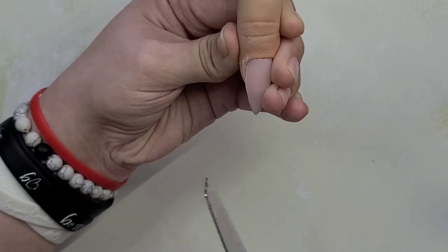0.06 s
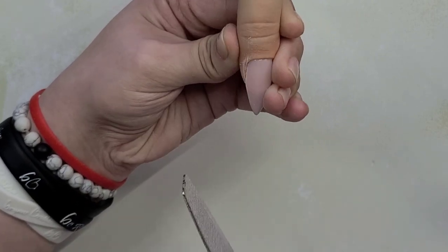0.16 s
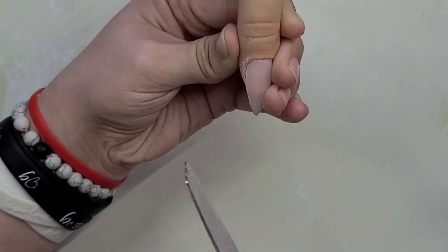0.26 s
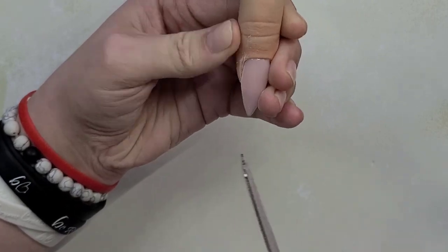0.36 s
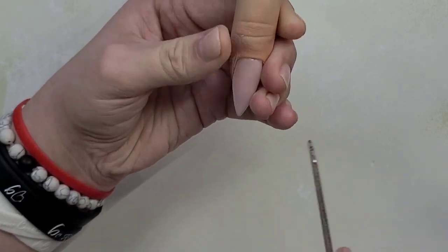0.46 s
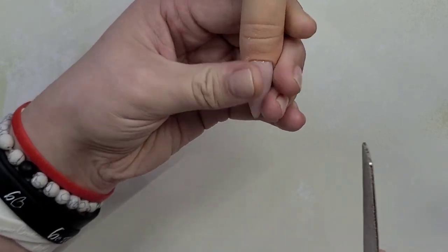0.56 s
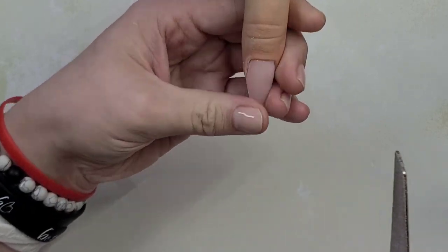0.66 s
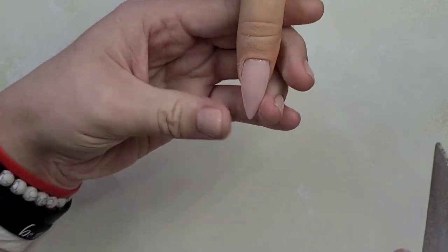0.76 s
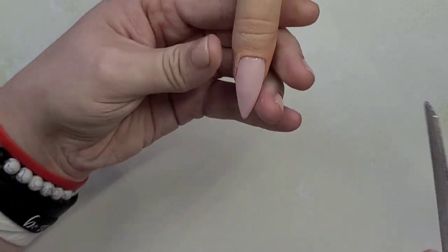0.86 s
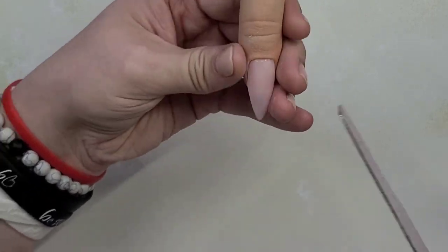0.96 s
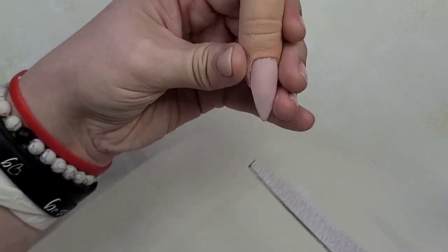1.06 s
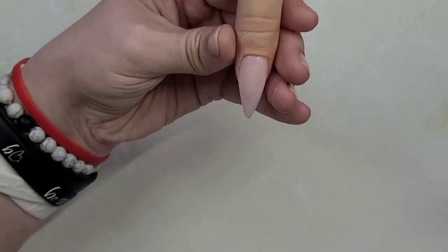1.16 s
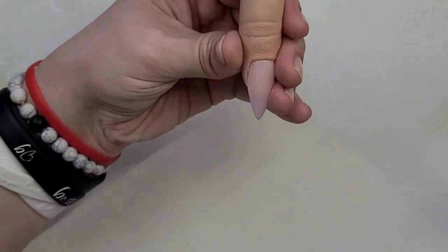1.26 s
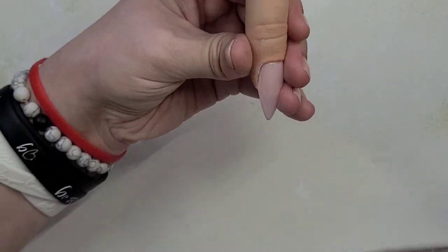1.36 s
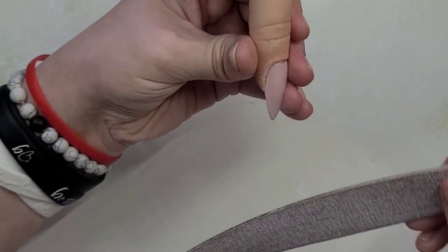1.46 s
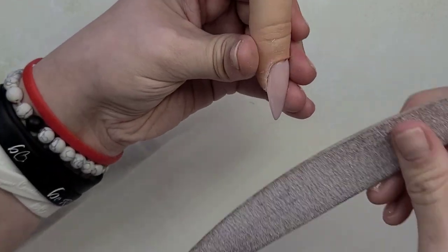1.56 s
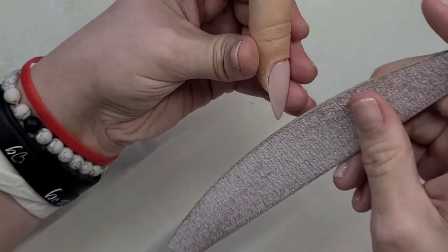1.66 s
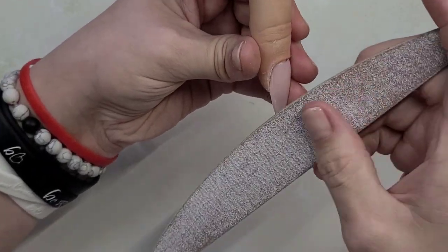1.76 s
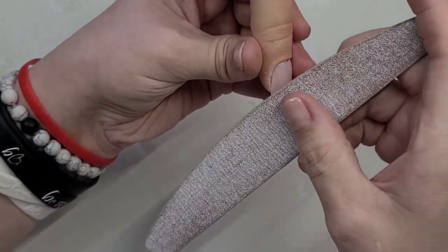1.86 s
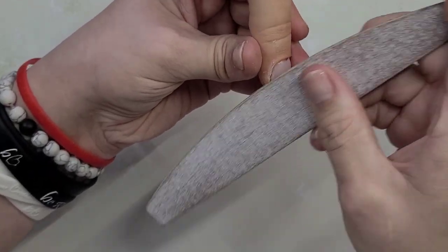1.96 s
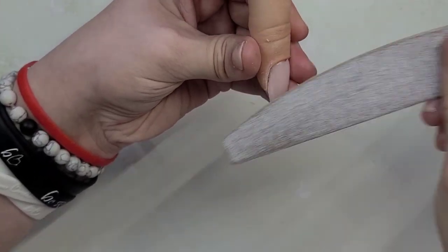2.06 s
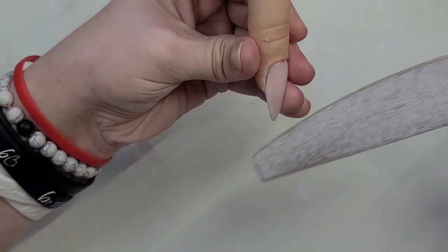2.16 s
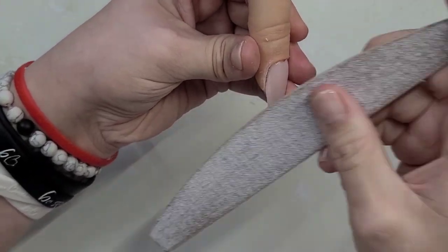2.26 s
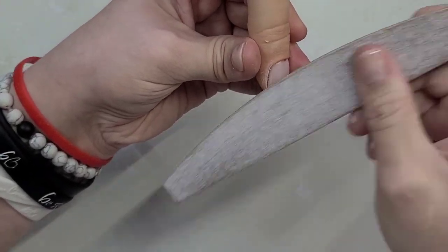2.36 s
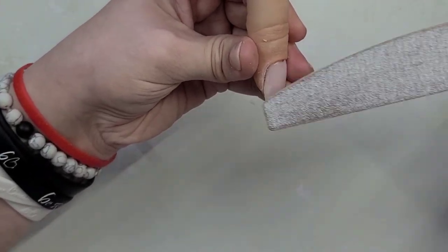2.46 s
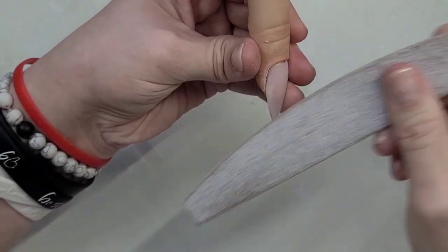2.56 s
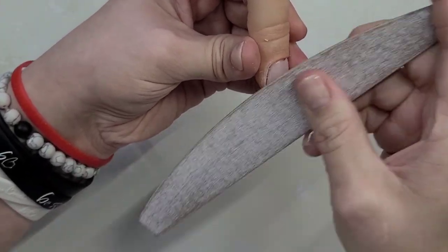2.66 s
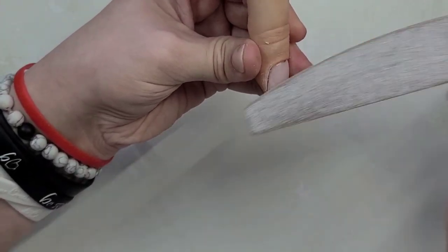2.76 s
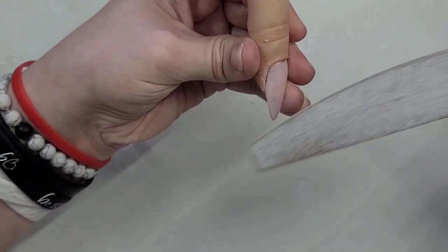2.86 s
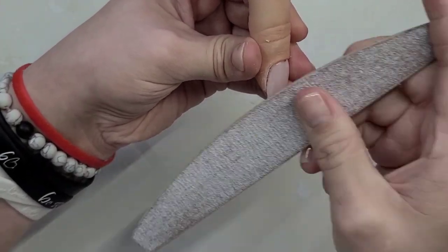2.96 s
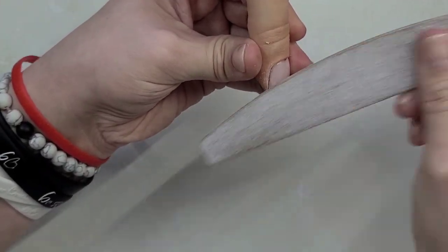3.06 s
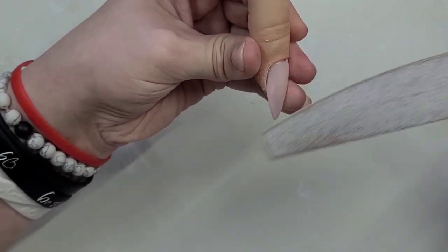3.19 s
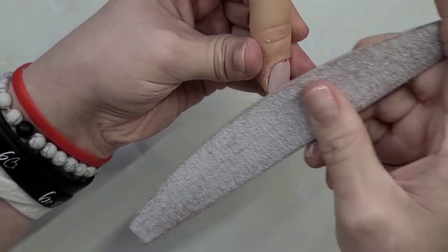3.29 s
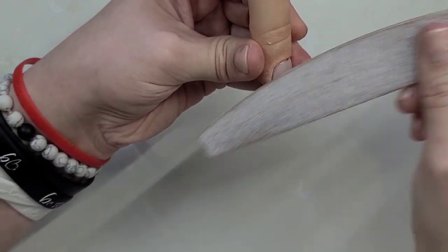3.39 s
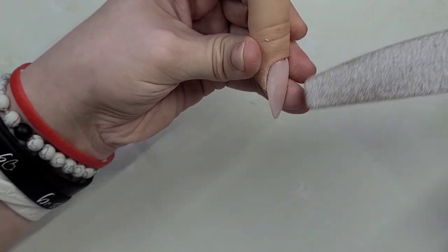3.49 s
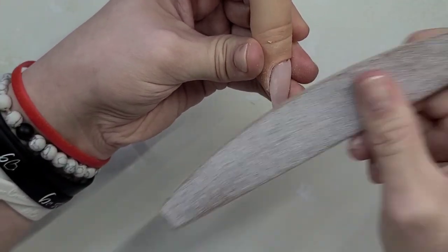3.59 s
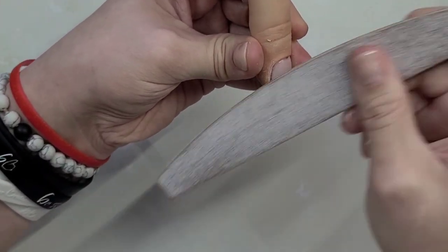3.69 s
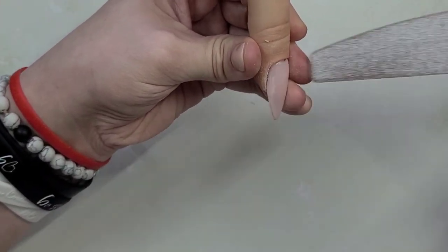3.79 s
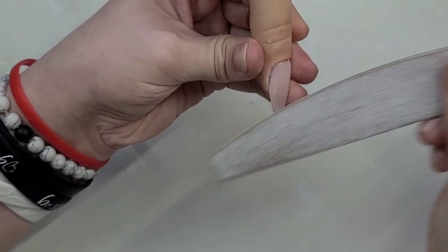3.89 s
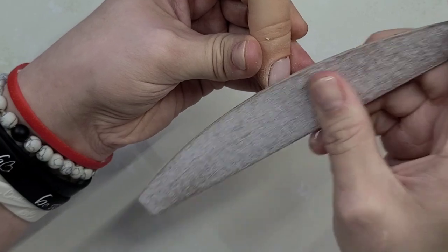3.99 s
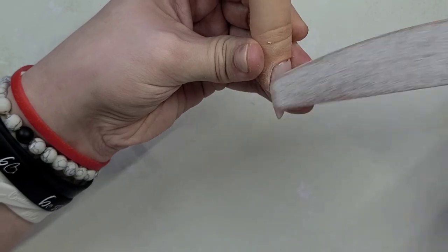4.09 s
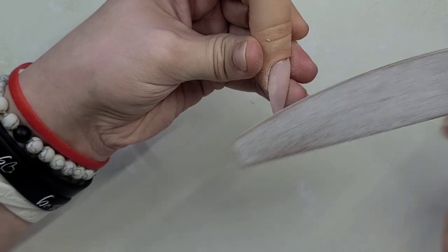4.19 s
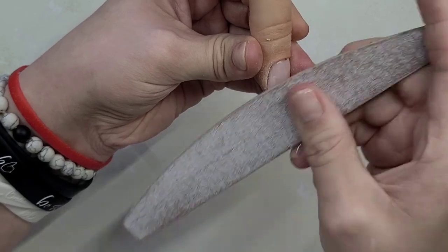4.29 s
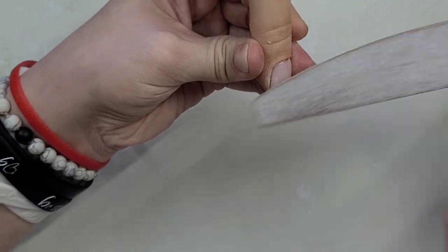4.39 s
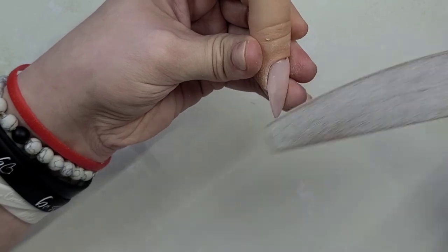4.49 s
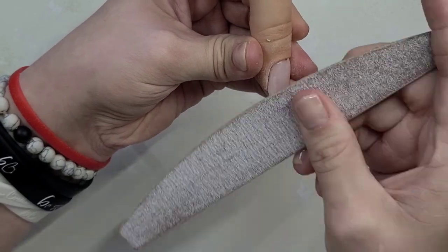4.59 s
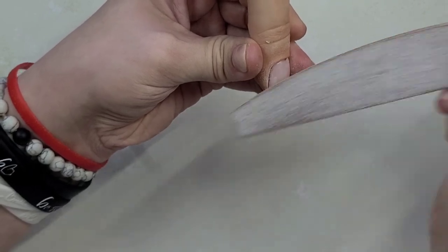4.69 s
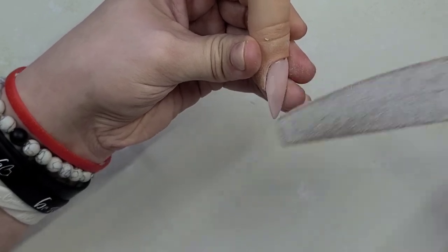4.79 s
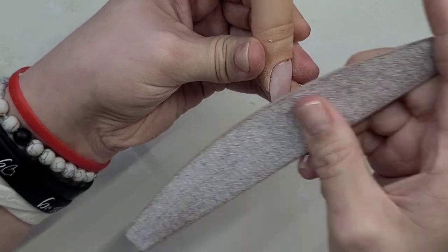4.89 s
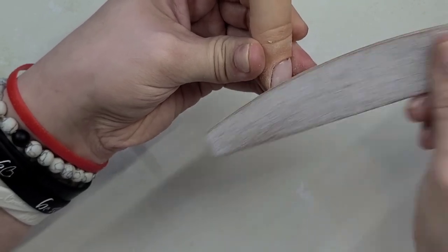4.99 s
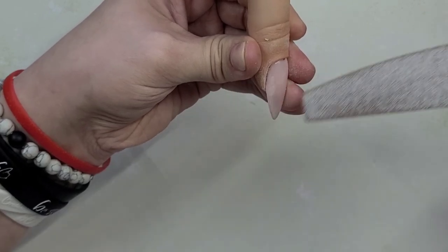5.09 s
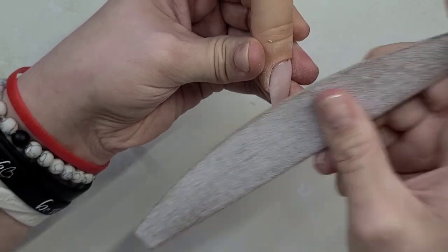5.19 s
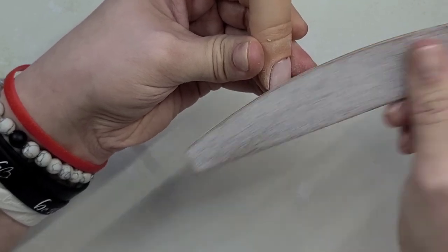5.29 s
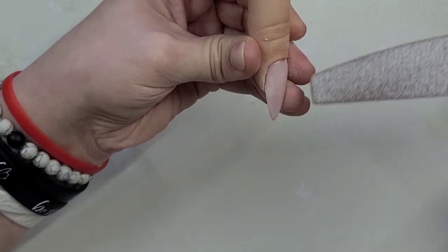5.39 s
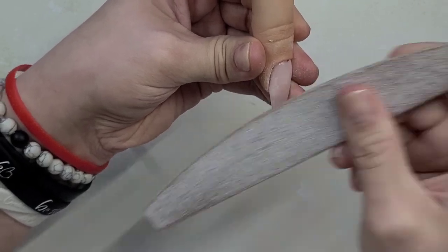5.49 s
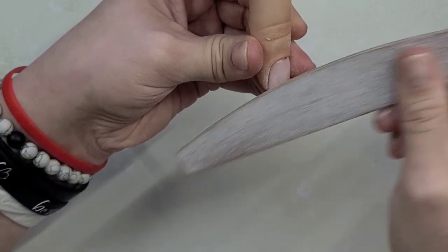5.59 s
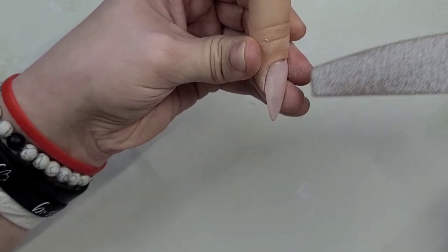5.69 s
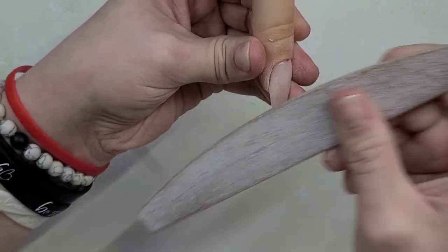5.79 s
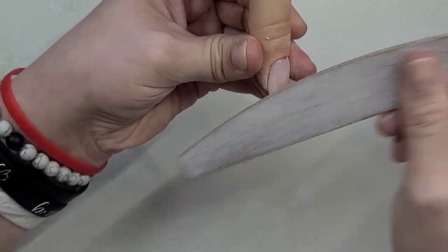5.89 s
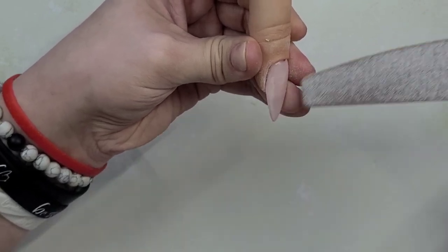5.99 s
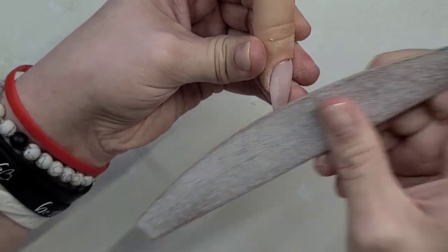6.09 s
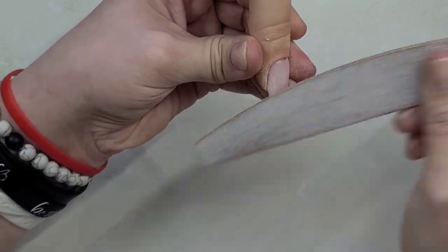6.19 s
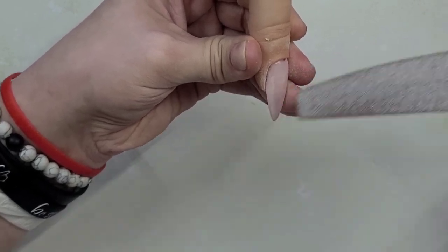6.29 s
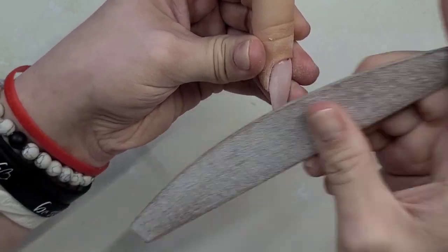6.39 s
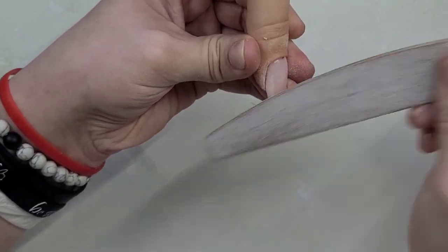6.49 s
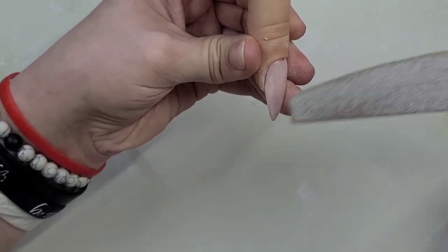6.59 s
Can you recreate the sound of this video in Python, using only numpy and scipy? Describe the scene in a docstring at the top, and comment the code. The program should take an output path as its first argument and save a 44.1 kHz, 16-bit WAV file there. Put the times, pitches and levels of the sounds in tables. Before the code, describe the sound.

Ventilation rumbles and hums steadily in a small, damped room while hands rustle faintly and make a few light ticks. After about two seconds, a gritty nail file starts scraping a hard false nail in short, hissy strokes, about three a second, snagging now and then. A hand bumps the table softly midway, and two small ticks fall among the last strokes. The microphones are very close.

```python
"""Ventilation rumble and mains hum fill a small damped room; hands rustle and tick close to two mics.
From about 2 s a gritty file crosses a hard false nail: a light touch, then short one-way strokes.
The grit tears at the nail in dense tiny clicks that ring file, nail and finger, and snags at times;
the room answers each stroke. Near 4 s a hand bumps the table, and two more ticks fall among
the last strokes."""
import sys
import numpy as np
from scipy import signal
from scipy.fft import rfft, irfft, next_fast_len
from scipy.io import wavfile
from scipy.ndimage import map_coordinates

SR = 44100
rng = np.random.default_rng(int(sys.argv[2]) if len(sys.argv) > 2 else 0)


def transcribe(u):
    """Save the signal u as a 16-bit wav file named by the first command-line argument.

    u: samples, shape (n,) or (channels, n), limited to [-1, 1]; the rate is SR.
    q: integer samples, one column per channel.
    """
    v = np.clip(np.atleast_2d(u).T, -1, 1)
    q = np.round(v * 32767).astype(np.int16)
    wavfile.write(sys.argv[1], SR, q)


N = 293265

# file strokes: landing t/s, landing re grip/dB, contact/s, hiss peak/dB, share of contact before the
# peak, swell from grip to peak/dB; bite, ring, hollow and body re hiss/dB; their sinking by the lift/dB
STROKES = [(1.935, -3, 0.039, -44.5, 1, 5.5, 2, 4.5, 1, -3, 3),
           (1.977, -10.5, 0.11, -19.5, 0.51, 7, 3.5, 4, 0.5, -5.5, 4.5),
           (2.356, -13, 0.12, -23, 0.4, 4.5, 2.5, -0.5, -3.5, -7.5, 11),
           (2.695, -10, 0.12, -22.5, 0.54, 4, 0, -1, -5, -12.5, 3.5),
           (3.036, -7, .125, -24, .7, 1.5, -1.5, -3, -6.5, -9.5, 4.5),
           (3.368, -9, 0.12, -20, 0.41, 8.5, 3, -0.5, -3.5, -10, 6),
           (3.702, -9, 0.11, -22, 0.67, 4, 2, 1.5, -3, -6.5, 6),
           (4.033, -10, 0.11, -22, 0.69, 3, 3.5, 1.5, -3.5, -6.5, 8),
           (4.349, -10.5, 0.1, -23, 0.31, 3, 0, -2, -5.5, -8.5, 4),
           (4.668, -9.5, 0.094, -23.5, 0.58, 0, -0.5, -1, -6.5, -10, 5),
           (4.972, -11, 0.099, -22.5, 0.67, 2, 2.5, -0.5, -4.5, -4, 9.5),
           (5.282, -10.5, 0.11, -24.5, 0.85, -0.5, 0, -4, -8, -9, 4.5),
           (5.59, -9, 0.1, -23, 0.95, 4.5, 2, -2, -5, -5.5, 7.5),
           (5.897, -10, 0.096, -24.5, 0.49, -1.5, -1, -2, -6.5, -8, 4),
           (6.188, -10.5, 0.09, -24, 0.3, 0.5, -2.5, -4.5, -6, -9, 3),
           (6.486, -9.5, .085, -24.5, 0.64, -1, 2, -1, -5.5, -9.5, 4)]
# broad colour of the rasp: f/Hz, density/dB
RASP_COLOUR = [(150, -4.5), (300, -10.5), (500, -12.5), (1200, -20.5), (1750, -18.5), (2500, -19.5),
               (4100, -22), (6000, -7.5), (10000, -10.5), (14000, -12.5), (15800, -21)]
# resonances of file and nail: f/Hz, width/Hz, relative level/dB
FILE_NAIL_MODES = [(560, 146, -8), (808, 85, -7), (1030, 80, -1.5), (1372, 106, -0.5), (1429, 115, -7.5),
                   (1873, 48, -9.5), (2180, 120, -6.5), (2298, 118, -5.5), (2391, 77, -10.5),
                   (2694, 26, -16.5), (2913, 60, -7), (3223, 107, -14.5), (4680, 284, -11),
                   (5340, 560, -13), (5796, 112, 2), (5870, 155, -4), (6165, 67, -4), (6620, 160, -14.5),
                   (7260, 320, -7), (7850, 37, -5), (8350, 250, -20), (9500, 190, -22), (10840, 480, -14),
                   (11540, 190, -9), (12770, 150, -17), (15450, 420, -18), (14100, 250, -5)]
# stereo image of rasp, snags and rustle: f/Hz, left-right likeness
CLOSE_LIKENESS = [(60, 0.72), (180, 1), (550, 1), (1650, 0.67), (4970, 0.14), (15000, 0.27)]
# snags of the grit: crest t/s, half length/s, rms level at the crest/dB, f/Hz
SNAGS = [(2.048, 0.016, -17, 2930), (2.396, 0.01, -19.5, 3070), (3.441, 0.047, -28.5, 1066),
         (5.687, 0.015, -32.5, 1320), (6.512, 0.037, -31.5, 1104)]
# brushes of hands and file: t/s, length/s, level/dB
BRUSHES = [(0.592, 0.13, -58.5), (.768, .015, -59.5), (0.833, .04, -55.5), (.925, 0.057, -55),
           (1.035, 0.092, -59), (1.762, 0.024, -52.5)]
# colour of the brushing: f/Hz, density/dB
RUSTLE_COLOUR = [(1500, -14), (2600, -2), (4000, -10.5), (6500, -1), (9000, -10), (15500, -15)]
# ticks of the nail or a bracelet: t/s, peak level/dB, f/Hz
TICKS = [(.714, -44, 2780), (0.73, -42, 2700), (1.2723, -33, 1940), (1.2832, -36, 1820),
         (5.8085, -32.5, 1750), (6.3979, -28.5, 1780)]
# bumps of the hand on the table: t/s, peak level/dB, f/Hz
BUMPS = [(4.046, -20.5, 76), (4.08, -25.5, 92.5)]
# colour of the ventilation: f/Hz, density/dB
VENT_COLOUR = [(12, -30), (30, -5), (40, -6), (75, -2), (105, -7), (150, -13.5), (300, -19.5), (600, -25.5),
               (1200, -27.5), (1600, -34), (4300, -43.5), (6000, -44), (7800, -47.5), (9400, -57),
               (13000, -49.5), (15600, -56)]
# stereo image of the ventilation: f/Hz, left-right likeness
VENT_LIKENESS = [(60, 0.97), (180, 0.93), (550, 0.47), (1650, -0.19), (4970, 0.089), (15000, 0.02)]
# standing waves of the room: f/Hz, width/Hz, level/dB
ROOM_MODES = [(170.9, 10, -54), (206.8, 16.4, -56), (258.6, 22.4, -52), (418.4, 62, -56.5),
              (983, 11, -67.5), (1130, 22, -60)]

GRAINS_PER_S, GRAIN_SPREAD_DB, SHARED_GRAINS = 7000, 2.5, 0.14
BOUNCE_LAGS_S = (0.00021, 0.00036, 0.0016)
MODE_MIX_DB, MODE_DRIFT_DB, JUDDER_DB, FINGER_LAG_S = -2, 2, 0.48, 0.0006
LAND_S, GRIP_S, LIFT_S, CLEAR_S = 0.0084, 0.017, 0.023, 0.033
EASED_DB, LIFTED_DB = -4, -25.5   # re the stroke's peak
KNOCK_DB, SINK_FACTORS = (2.9, 3.2, 1.5, 0.6), (0.94, 0.79, 0.38, 1.46)   # bite, ring, hollow, body
TABLE_ECHO_S, ECHO_WANDER_S, TABLE_ECHO_DB = 0.0011, 0.000118, -2.5
VENT_DB, HUM_HZ, HUM_DB, HUM_WAVER_DB = -37.5, 121.1, -39, 1.34


def rasp():
    """Grit rings file and nail; each resonance swells and fades as the contact slides along the file."""
    grains, ringing = grit(), 0
    for k, (hz, width_hz, level_db) in enumerate(FILE_NAIL_MODES):
        gain = from_db(level_db + MODE_DRIFT_DB * drift(6.6)) * (-1) ** k
        mid, side = gain * resonance(grains, hz, width_hz)
        ringing = ringing + to_stereo(mid, side, at_hz(CLOSE_LIKENESS, hz))
    scrape = coloured(grit(), RASP_COLOUR, CLOSE_LIKENESS) + from_db(MODE_MIX_DB) * rms_one(ringing)
    judder = from_db(JUDDER_DB * drift(51))   # the file judders over the edge
    hiss_gain, bite_gain, ring_gain, hollow_gain, body_gain = stroke_envelopes() * judder
    pole = np.exp(-1 / (FINGER_LAG_S * SR))   # the finger takes a moment to move along
    body_gain = signal.lfilter([1 - pole], [1, -pole], body_gain)
    hiss = hiss_gain * rms_one(table_echo(band(scrape, 4000, 19500)))
    nail_bite = bite_gain * rms_one(band(scrape, 2550, 4000))
    file_ring = ring_gain * rms_one(band(scrape, 1600, 2550))
    nail_hollow = hollow_gain * rms_one(band(scrape, 700, 1750))
    finger_body = body_gain * rms_one(band(scrape, 200, 700))
    return (hiss + nail_bite + file_ring + nail_hollow + finger_body) * from_db([[0.07], [-0.07]])


def grit():
    """Grains catch the nail at random, as mid and side; the side is partly the same clicks, bounced."""
    sizes = from_db(GRAIN_SPREAD_DB * np.minimum(rng.exponential(1, (2, N)), 5))
    signs = rng.choice([-1, 1], (2, N))
    hits = rng.random((2, N)) < GRAINS_PER_S / SR
    mid, unrelated = rms_one(sizes * signs * hits)
    bounced = mid
    for lag_s in BOUNCE_LAGS_S:   # reflections off hands and table scatter the phase
        taps = np.zeros(round(lag_s * SR) + 1)
        taps[[0, -1]] = 1, -0.6
        bounced = signal.lfilter(taps[::-1], taps, bounced)
    return np.array([mid, np.sqrt(SHARED_GRAINS) * bounced + np.sqrt(1 - SHARED_GRAINS) * unrelated])


def stroke_envelopes():
    """Gains of hiss, bite, ring, hollow and body as the file lands, grips, swells, eases and lifts."""
    out, t = np.zeros((5, N)), np.arange(int(0.3 * SR)) / SR
    knock = np.clip(1 - (t - LAND_S) / GRIP_S, 0, 1)
    for s, landing_db, contact_s, peak_db, peak_share, swell_db, *colour_db, sink_db in STROKES:
        grip, lift = LAND_S + GRIP_S, LAND_S + contact_s
        peak = np.clip(LAND_S + peak_share * contact_s, grip + 0.001, lift - 0.001)
        times = [0, LAND_S, grip, peak, lift, lift + LIFT_S, lift + LIFT_S + CLEAR_S]
        shape_db = [-60, landing_db - swell_db, -swell_db, 0, EASED_DB, LIFTED_DB, -75]
        hiss_db = peak_db + np.interp(t, times, shape_db)
        # the lower bands knock on landing, then sink, so the stroke thins out
        lower_db = [hiss_db + db + knock_db * knock - factor * sink_db * t / lift
                    for db, knock_db, factor in zip(colour_db, KNOCK_DB, SINK_FACTORS)]
        start = round((s - LAND_S) * SR)
        out[:, start:start + len(t)] += from_db([hiss_db, *lower_db])[:, :N - start]
    return out


def snags(width_share=0.11):
    """The grit snags briefly and one resonance flares."""
    out, grains, t = 0, grit(), np.arange(N) / SR
    for s, half_s, db, hz in SNAGS:
        width_hz = width_share * hz
        mid, side = rms_one(resonance(resonance(grains, hz, width_hz), hz, width_hz))
        swell = np.cos(np.pi / 2 * np.clip((t - s) / half_s, -1, 1)) ** 2
        out = out + from_db(db) * swell * to_stereo(mid, side, at_hz(CLOSE_LIKENESS, hz))
    return out


def rustle(attack_s=0.022, fade_s=0.048, flutter_db=2.5):
    """Skin and grit brush softly before the filing starts."""
    gain, t = 0, np.arange(N) / SR
    for s, length_s, db in BRUSHES:
        times = [-attack_s, 0, length_s, length_s + fade_s, length_s + 3 * fade_s]
        gain = gain + from_db(db + np.interp(t - s, times, [-48, 1, 0.5, -16, -60]))
    noise = coloured(rng.standard_normal((2, N)), RUSTLE_COLOUR, CLOSE_LIKENESS)
    return gain * from_db(flutter_db * drift(25)) * noise


def ticks(decay_s=0.005, width_hz=480):
    """Short bursts of contact noise, each through a broad, dull plastic resonance."""
    out, t = np.zeros((2, N)), np.arange(int(0.083 * SR)) / SR
    for s, peak_db, hz in TICKS:
        burst = rng.standard_normal((2, len(t))) * np.exp(-t / decay_s)
        mid, side = band(resonance(burst, hz, width_hz), 550, 4100)
        tick = to_stereo(mid, side, likeness=0.55)
        start = round(s * SR)
        out[:, start:start + len(t)] += from_db(peak_db) * tick / np.abs(tick).max()
    return out


def hand_bumps(length_s=0.051):
    """The hand meets the table in soft low thuds that swell and die."""
    out = 0
    for s, peak_db, hz in BUMPS:
        t = np.clip(np.arange(N) / SR - s, 0, length_s)
        swell = np.sin(np.pi * t / length_s) ** 2
        out = out + from_db(peak_db) * swell * np.cos(2 * np.pi * hz * (t - length_s / 2))
    return out


def table_echo(x):
    """A close reflection whose path changes as the file travels, so its comb notches slide."""
    lags = SR * np.maximum(TABLE_ECHO_S + ECHO_WANDER_S * np.array([drift(3.8), drift(3.98)]), 0)
    echo = [map_coordinates(channel, [np.arange(N) - lag], order=3) for channel, lag in zip(x, lags)]
    return x + from_db(TABLE_ECHO_DB) * np.array(echo)


def room_reverb(x, t60_s=0.17, wet_db=-11.5, damping_hz=12600):
    """Diffuse, damped reflections die away fast, unrelated at the two mics."""
    t = np.arange(int(0.6 * SR)) / SR
    tail = rng.standard_normal((2, len(t))) * from_db(-60 * t / t60_s) * (t > 0.004)
    tail = signal.sosfilt(signal.butter(1, damping_hz, fs=SR, output="sos"), tail)
    tail = tail / np.sqrt(np.sum(tail ** 2, axis=1, keepdims=True))
    return from_db(wet_db) * signal.fftconvolve(x, tail, axes=1)[:, :N]


def room_tone():
    """The bed, leaning left: ventilation rumble and hiss, standing waves and a wavering mains hum."""
    air = from_db(VENT_DB) * coloured(rng.standard_normal((2, N)), VENT_COLOUR, VENT_LIKENESS)
    white = rng.standard_normal((2, N))
    for hz, width_hz, level_db in ROOM_MODES:
        mid, side = resonance(resonance(white, hz, width_hz), hz, width_hz)
        air = air + from_db(level_db) * rms_one(to_stereo(mid, side, at_hz(VENT_LIKENESS, hz)))
    hum_gain = np.sqrt(2) * from_db(HUM_DB + HUM_WAVER_DB * drift(9.2))
    hum = hum_gain * np.sin(2 * np.pi * HUM_HZ * np.arange(N) / SR)
    return (air + hum) * from_db([[0.6], [-0.6]])


def from_db(db):
    """Decibels to gain."""
    return 10 ** (np.asarray(db) / 20)


def rms_one(x):
    """Scaled to rms 1."""
    return x / np.sqrt(np.mean(x ** 2) + 1e-20)


def at_hz(points, hz):
    """A curve read on a log-frequency axis."""
    freqs, values = np.array(points).T
    return np.interp(np.log(hz), np.log(freqs), values)


def drift(rate_hz):
    """A smooth random modulator of rms 1 that rolls off above this rate."""
    hop = 40
    pole = np.exp(-2 * np.pi * hop * rate_hz / SR)
    white = rng.standard_normal(N // hop + 2002)
    slow = signal.lfilter([1], [1, -2 * pole, pole * pole], white)[2000:]
    return np.interp(np.arange(N) / hop, np.arange(len(slow)), rms_one(slow))


def to_stereo(mid, side, likeness):
    """Left and right from unrelated mid and side: likeness 1 is mono, 0 is wide."""
    return np.sqrt(1 + likeness) * mid + np.sqrt(1 - likeness) * side * [[1], [-1]]


def coloured(pair, colour, likeness):
    """A white mid-side pair given an EQ curve and a stereo width by frequency; rms 1."""
    size = next_fast_len(N)
    hz = np.maximum(np.arange(size // 2 + 1) * SR / size, 1)
    mid, side = rfft(pair, size) * from_db(at_hz(colour, hz))
    return rms_one(irfft(to_stereo(mid, side, at_hz(likeness, hz)), size)[:, :N])


def resonance(x, hz, width_hz):
    """A two-pole resonator with a peak gain of 1."""
    r = np.exp(-np.pi * width_hz / SR)
    gain = (1 - r * r) / 2
    return signal.lfilter([gain, 0, -gain], [1, -2 * r * np.cos(2 * np.pi * hz / SR), r * r], x)


def band(x, low_hz, high_hz):
    """A steep band-pass."""
    return signal.sosfilt(signal.butter(3, [low_hz, high_hz], "band", fs=SR, output="sos"), x)


def scene():
    """Filing, rustle and ticks up close with their reverb, over dry bumps and the room tone."""
    close = rasp() + snags() + rustle() + ticks()
    return close + room_reverb(close) + hand_bumps() + room_tone()


def record(dry):
    """A steep low-pass takes off the very top."""
    cutoff_hz = 15560
    return signal.sosfilt(signal.ellip(12, 0.5, 70, cutoff_hz, fs=SR, output="sos"), dry)


dry = scene()
out = record(dry)
transcribe(out)
```